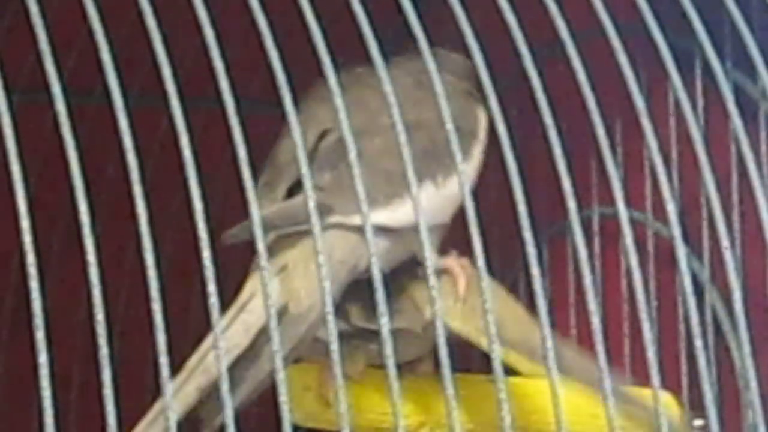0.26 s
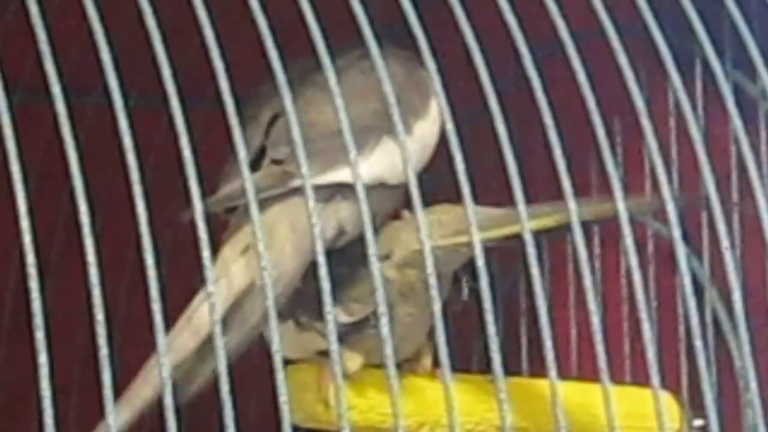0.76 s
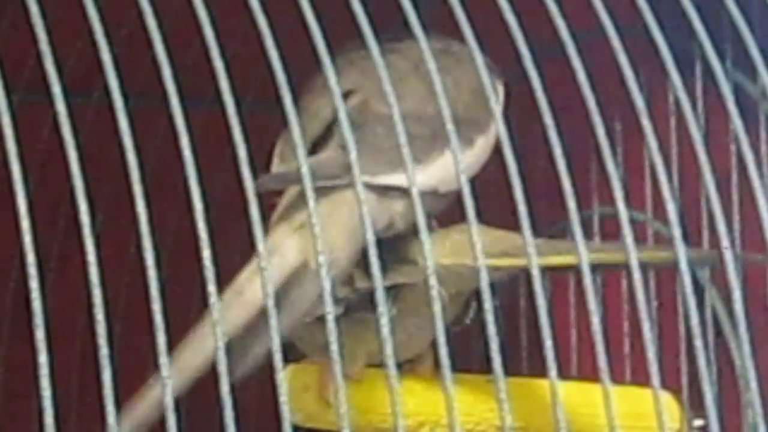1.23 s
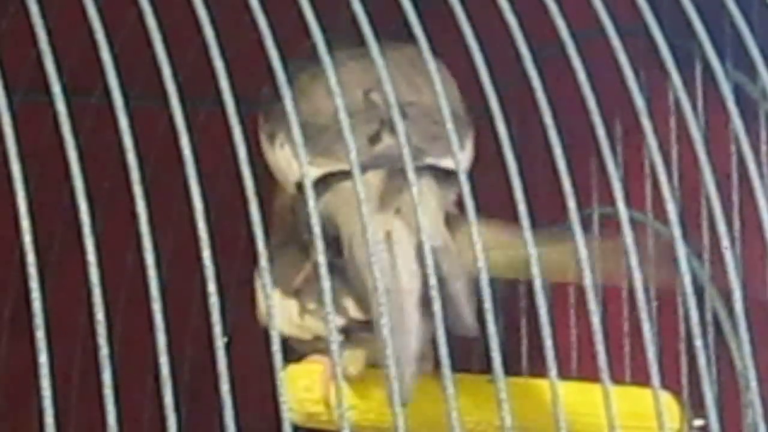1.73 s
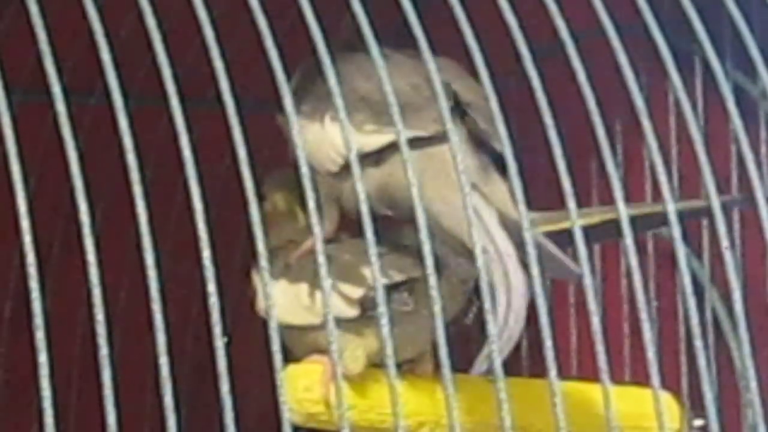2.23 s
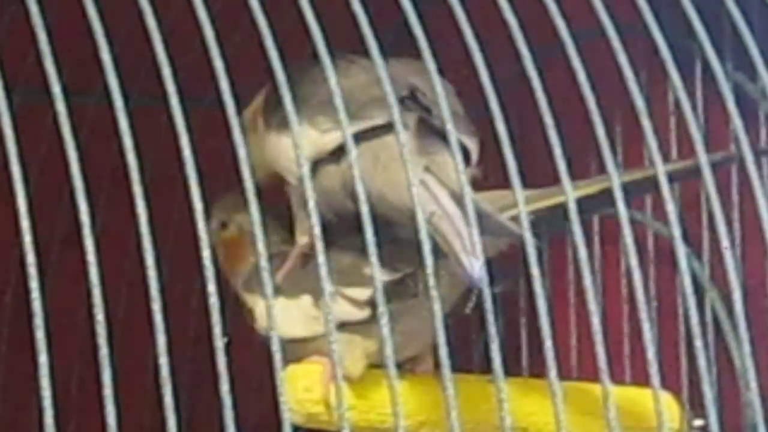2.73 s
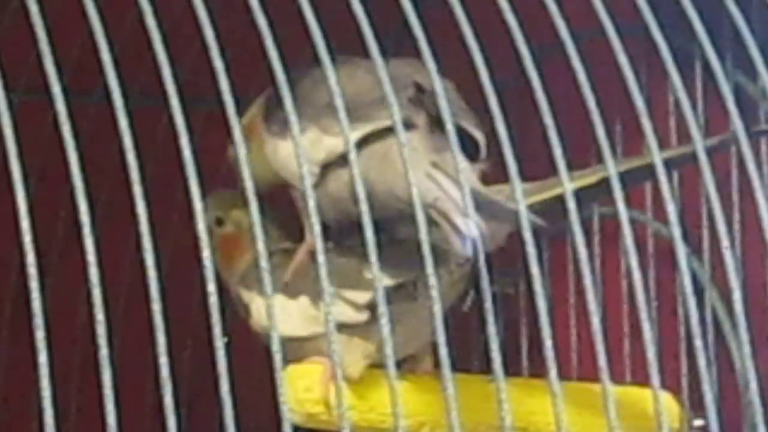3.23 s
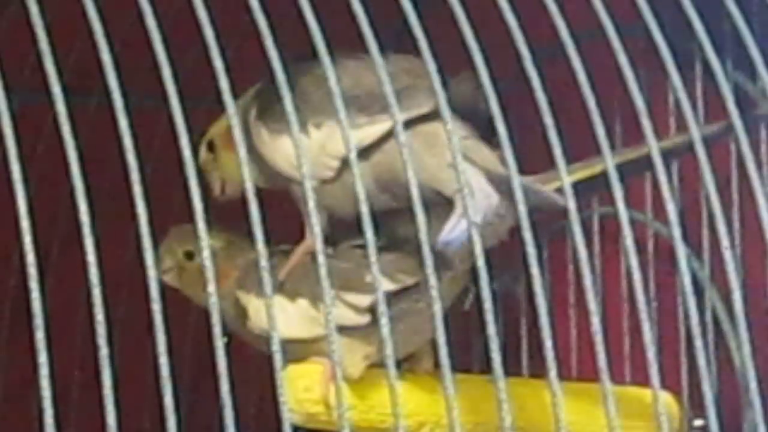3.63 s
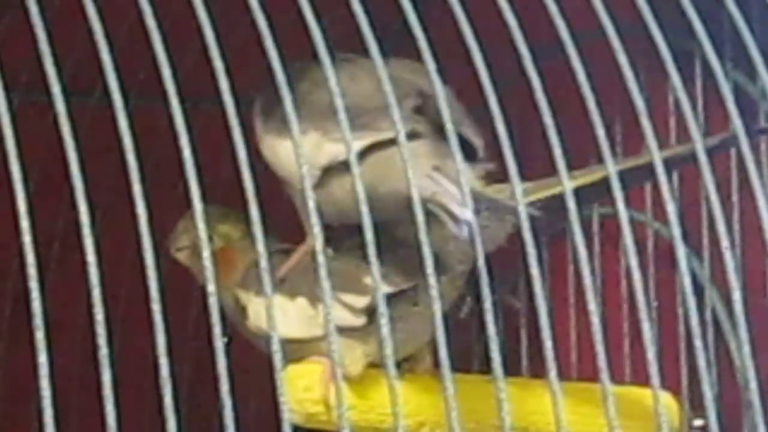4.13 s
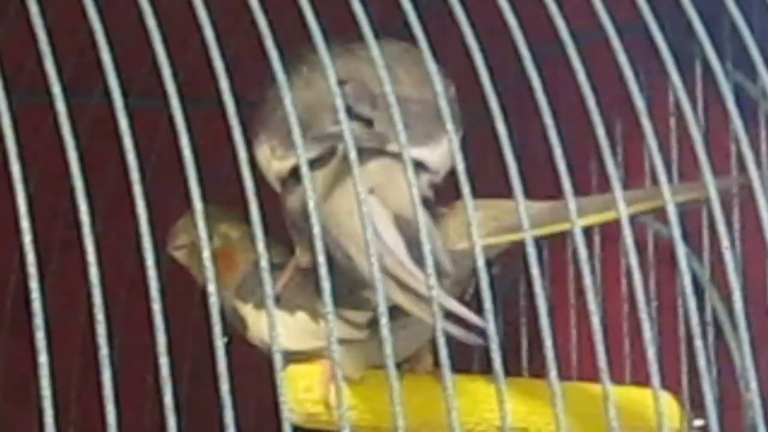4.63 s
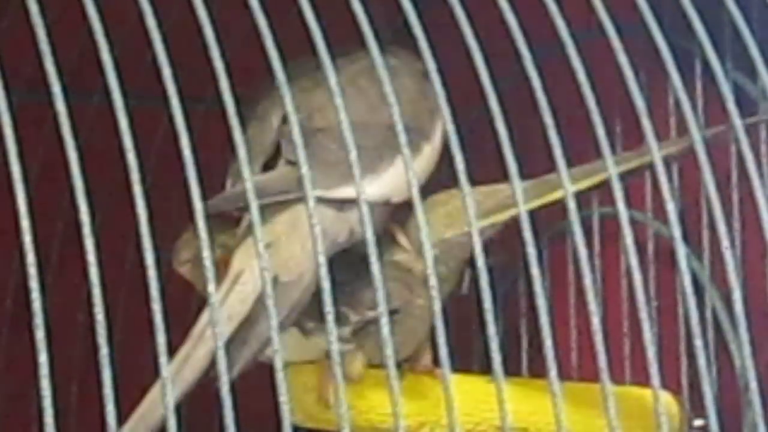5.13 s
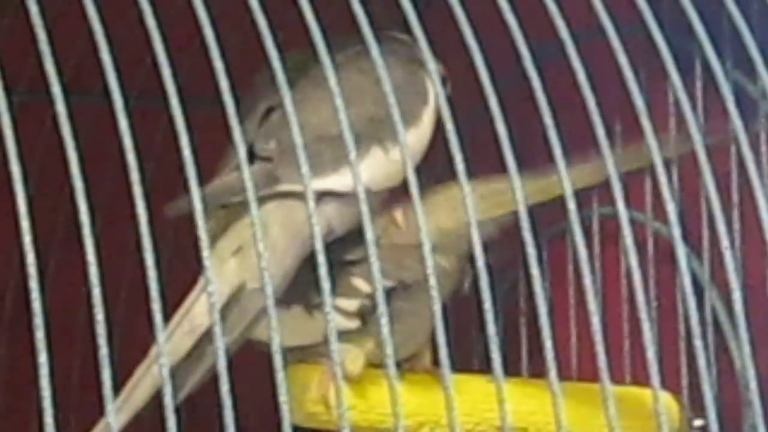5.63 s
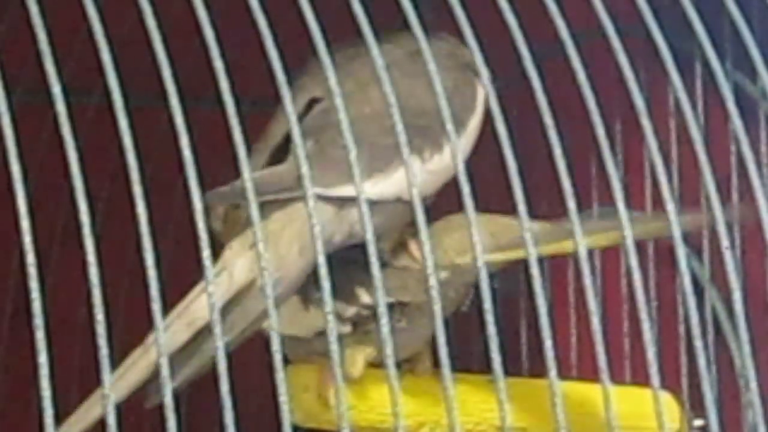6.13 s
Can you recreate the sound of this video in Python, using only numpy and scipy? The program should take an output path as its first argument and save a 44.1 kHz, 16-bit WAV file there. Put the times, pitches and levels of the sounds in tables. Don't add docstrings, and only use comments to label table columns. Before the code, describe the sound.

Two caged cockatiels call a metre or two from a small camera. A lone swooping whistle leads into a hurried cluster of chirps and hoarse squawks, then loud harsh screams, a few softer whistles, a pause, and bright closing notes. Hard walls give each call a short ring. Claws scratch lightly, a wing puffs, and hiss, distant traffic rumble and thin camera-motor whine continue underneath.

```python
import sys
import numpy as np
from scipy import signal
from scipy.fft import rfft, irfft
from scipy.io import wavfile
from scipy.ndimage import uniform_filter1d

SR = 44100
rng = np.random.default_rng(int(sys.argv[2]) if len(sys.argv) > 2 else 0)


def convert_level_to_amplitude(level_db):
    exponent = np.asarray(level_db, float) / 20
    return 10 ** exponent


def bounce(signal):
    frames = np.transpose(np.atleast_2d(signal))
    limited = np.clip(frames, -1, 1)
    pcm = np.round(limited * 32767).astype(np.int16)
    wavfile.write(sys.argv[1], SR, pcm)


N = 280476


def read_db(points, hz):
    at_hz, level_db = np.transpose(points)
    return np.interp(np.log(hz), np.log(at_hz), level_db)


def colour(x, points):
    hz = np.arange(len(x) // 2 + 1) * SR / len(x) + 1
    y = irfft(rfft(x) * convert_level_to_amplitude(read_db(points, hz)), len(x))
    return y / np.std(y)


def noise_band(low_hz, high_hz):
    band = signal.butter(2, [low_hz, high_hz], "band", fs=SR, output="sos")
    y = signal.sosfilt(band, rng.standard_normal(N))
    return y / np.std(y)


def walk(turns_per_s):
    k = max(int(SR / turns_per_s), 2)
    y = uniform_filter1d(uniform_filter1d(rng.standard_normal(N), k), k)
    return y / np.std(y)


def sine(hz):
    return np.sin(2 * np.pi * np.cumsum(hz) / SR)


# pitch_hz, level_db
HISS_COLOUR = [(15, -46), (25, -1), (268, -4.5), (617, -6), (975, -8), (1210, -8), (1350, -8.5),
               (1760, -8.5), (2020, -10), (2440, 0.5), (3100, -13), (3750, -11), (4650, -16.5),
               (10700, -21.5), (15600, -29.5)]


def hiss():
    return convert_level_to_amplitude(-51.5 + .5 * walk(0.34)) * colour(rng.standard_normal(N), HISS_COLOUR)


# time_s, nearness_db
TRAFFIC_NEARNESS = [(0, -6), (2.8, -5), (3.1, -3), (3.7, -1), (4.3, 1.5), (4.7, 1.8), (5.5, .3),
                    (6.36, -1.5)]


def traffic():
    t = np.arange(N) / SR
    near_db = np.interp(t, *np.transpose(TRAFFIC_NEARNESS))
    thrum = convert_level_to_amplitude(-62.5 + 2.9 * near_db + 2.6 * walk(25)) * sine(40.5 + 2.05 * walk(5.5))
    drone = convert_level_to_amplitude(-61 + 0.9 * near_db) * noise_band(233, 364)
    return thrum + drone


# pitch_hz, level_db
GEAR_TONES = [(1863, -71), (2439, -62), (2466, -76), (2756, -64), (5830, -84), (6691, -79), (7854, -96),
              (7881, -75)]
# pitch_hz, width_hz, level_db
SHELL_BANDS = [(2550, 130, -67.5), (2816, 270, -63), (1807, 58, -68.5)]


def camera_motor():
    t = np.arange(N) / SR
    shaft_hz, shaft_depth = 28.8, 0.23
    turn = 1 + shaft_depth * np.sin(2 * np.pi * shaft_hz * t)
    drift = np.cumsum(1 + 0.0008 * walk(4.9)) / SR
    whine = sum(convert_level_to_amplitude(db + 2 * walk(6.4)) * np.sin(2 * np.pi * hz * drift) for hz, db in GEAR_TONES)
    shell = sum(convert_level_to_amplitude(db) * noise_band(hz - width / 2, hz + width / 2) for hz, width, db in SHELL_BANDS)
    return shell + np.sqrt(2) * turn * whine


def note(row, scoop_hz, crest, bend, swell_db, tilt_db, half_db, rasp_db, over_db):
    start_s, length_s, crest_hz, end_hz, level_db = row
    u = np.arange(17) / 16
    before = np.clip(1 - u / crest, 0, 1)
    after = np.clip((u - crest) / (1 - crest), 0, 1)
    pitch_hz = crest_hz - scoop_hz * before ** 2.6 - (crest_hz - end_hz) * after ** bend
    lift_db = tilt_db * after - swell_db * before
    held_db = 0.39 * lift_db
    effort_db = -0.23 * (level_db + 31) + 0 * u
    return np.transpose([start_s + length_s * u, pitch_hz, level_db + lift_db,
                         half_db - held_db, rasp_db - held_db, over_db + effort_db])


def phrase(tables):
    notes = (note(row, **kind) for rows, kind in tables for row in rows)
    return sorted(notes, key=lambda n: n[0][0])


def breath_control(notes):
    t = np.arange(N) / SR
    s, *columns = np.concatenate(notes).T
    hz, level_db, half_db, rasp_db, over_db = (np.interp(t, s, c) for c in columns)
    gate = np.zeros(N)
    for n in notes:
        opening, shutting = (t - n[0][0]) / 0.0012, (n[-1][0] - t) / .011
        gate += np.clip(np.minimum(opening, shutting), 0, 1)
    return hz, gate * convert_level_to_amplitude(level_db - 5.5), half_db, rasp_db, over_db


# pitch_multiple, level_db
OVERTONE_LINES = [(3, 3.5), (4, 2.5), (5, -3)]
# pitch_multiple, level_db
HALF_PITCH_LINES = [(.5, 2), (1.5, -17.5)]
# pitch_hz, level_db
THROAT_COLOUR = [(400, -26), (800, -10.5), (1400, -8.5), (2000, -13), (2800, 3.5), (3600, -2.5),
                 (5200, -11.5), (7000, -29.5), (8600, -18), (10000, -25), (11500, -24), (13000, -20),
                 (15500, -32)]
# pitch_hz, level_db
WINDPIPE_GAIN = [(2500, 15), (3300, -6), (4600, -14.5), (5150, -21), (5600, -22), (6100, -19.5),
                 (7200, -23.5), (8600, -6), (10000, -24.5), (11400, 2.5), (12800, -15), (14200, -8),
                 (15500, -19)]
# pitch_hz, level_db
BEAK_GAIN = [(1300, -2), (1900, 1), (2300, 0.5), (2700, 4.5)]
# start_s, end_s, chaos (0 to 1)
VOICE_BREAKS = [(1.075, 1.12, .3), (1.19, 1.265, .4), (1.61, 1.8, .55), (1.835, 1.88, .5),
                (2.124, 2.16, .3), (2.155, 2.21, .6), (2.5, 2.58, .7), (2.6, 2.7, .12), (3.065, 3.1, .6),
                (3.22, 3.36, .45), (3.272, 3.32, .3), (3.625, 3.66, .2), (5.2, 5.24, .15),
                (5.768, 5.83, .7), (6.2, 6.23, .4)]


def bird(tables):
    hz, loud, half_db, rasp_db, over_db = breath_control(phrase(tables))
    t = np.arange(N) / SR
    chaos = .12 * np.ones(N)
    for start_s, end_s, strength in VOICE_BREAKS:
        chaos += strength * np.clip(np.minimum(t - start_s, end_s - t) / 0.0087, 0, 1)
    shake = 1 + chaos * (.03 * walk(500) + .025 * walk(60))
    cycles = np.cumsum(hz * shake / SR)

    def partial(multiple, db):
        return convert_level_to_amplitude(db) * np.sin(2 * np.pi * multiple * cycles)

    whistle = partial(0.98, read_db(BEAK_GAIN, hz)) + partial(2, read_db(WINDPIPE_GAIN, 2 * hz))
    for k, db in OVERTONE_LINES:
        whistle += partial(k, over_db + db + read_db(WINDPIPE_GAIN, k * hz))
    flap = sine(650 * (1 + .25 * walk(25)))
    whistle *= (1 - .6 * chaos + .45 * chaos * flap) * convert_level_to_amplitude((.8 + 5 * chaos) * walk(250))
    half = np.zeros(N)
    for k, db in HALF_PITCH_LINES:
        half += partial(k, half_db + 9 * chaos + db) * (0.61 + 0.59 * walk(780))
    slaps = np.diff(np.floor(cycles), prepend=0) * rng.standard_normal(N) * convert_level_to_amplitude(0.5 * walk(300))
    rasp = convert_level_to_amplitude(rasp_db + 10 * chaos + 6) * colour(slaps, THROAT_COLOUR)
    return loud * (np.sqrt(2) * (whistle + half) + rasp)


# start_s, length_s, crest_hz, end_hz, level_db
SECOND_PEEPS = [(0, 0.036, 2163, 2760, -41.5), (1.195, 0.064, 3170, 2880, -40),
                (1.347, 0.02, 1640, 1570, -31), (1.612, .023, 2524, 1897, -36),
                (1.678, .017, 2516, 2509, -29), (1.73, 0.041, 2453, 1882, -37),
                (2.552, .022, 3314, 3289, -37.5), (2.76, .018, 2058, 2084, -37),
                (4.692, 0.017, 2320, 2100, -32), (5.158, 0.0212, 2218, 2647, -42),
                (5.675, .055, 2125, 2098, -43.5)]
PEEP = dict(scoop_hz=17, crest=.15, bend=1.1, swell_db=-1, tilt_db=2.5, half_db=-29, rasp_db=-28.5, over_db=-31)
SECOND_RASPS = [
    (1.83, .017, 3518, 3292, -31),
    (1.848, .036, 2306, 1472, -26.5),
    (3.3, .045, 2458, 1688, -35.5),
    (5.775, .055, 2005, 1329, -35.5),
]
RASP = dict(scoop_hz=15, crest=.15, bend=1.1, swell_db=-3, tilt_db=2, half_db=-33, rasp_db=-23, over_db=-19)
SECOND_CALLS = [
    (3.602, .035, 2870, 2564, -25),
]
CALL = dict(scoop_hz=153.7, crest=.45, bend=1.4, swell_db=17, tilt_db=2, half_db=-25, rasp_db=-15.5, over_db=-28)
SECOND_HOLDS = [
    (3.638, .056, 2585, 2033, -25.5),
]
SECOND_HOLD = dict(scoop_hz=12, crest=.1, bend=3.2, swell_db=-7, tilt_db=-3,
                   half_db=-26, rasp_db=-15.5, over_db=-16)
SECOND_DOUBLES = [
    (2.722, .03, 3068, 3310, -33),
]
SECOND_DOUBLE = dict(scoop_hz=15, crest=.1, bend=1.1, swell_db=5, tilt_db=3,
                     half_db=-6.5, rasp_db=-22, over_db=-28)


def second_bird():
    return bird([(SECOND_PEEPS, PEEP), (SECOND_RASPS, RASP), (SECOND_CALLS, CALL),
                 (SECOND_HOLDS, SECOND_HOLD), (SECOND_DOUBLES, SECOND_DOUBLE)])


# delay_s, level_db
WALL_ECHOES = [
    (.0052, -8),
    (0.0117, -9),
    (0.0209, -8.5),
    (.033, -21),
    (.046, -11.5),
]


def room(x):
    t = np.arange(SR) / SR
    t60_s, treble_t60_s = 0.54, 0.48
    noise = rng.standard_normal(len(t))
    low = signal.sosfilt(signal.butter(2, 5000, fs=SR, output="sos"), noise)
    tail = low * convert_level_to_amplitude(-60 * t / t60_s) + (noise - low) * convert_level_to_amplitude(-60 * t / treble_t60_s)
    tail *= np.clip((t - 0.0063) / 0.0043, 0, 1)
    energy = SR * t60_s / (2 * np.log(1000))
    tail *= convert_level_to_amplitude(-1) / np.sqrt(energy)
    for delay_s, db in WALL_ECHOES:
        tail[int(delay_s * SR)] += convert_level_to_amplitude(db)
    return x + signal.fftconvolve(x, tail)[:N]


# start_s, length_s, crest_hz, end_hz, level_db
SWOOPS = [
    (.666, .082, 2826, 1501, -30.5),
    (4.102, .08, 2560, 2129, -31.5),
]
SWOOP = dict(scoop_hz=1348.4, crest=.5, bend=2.3, swell_db=12, tilt_db=-5.5,
             half_db=-35, rasp_db=-36, over_db=-27.5)
HOARSE_NOTES = [
    (1.068, .071, 2843, 2410, -31),
]
HOARSE = dict(scoop_hz=20, crest=.3, bend=1.3, swell_db=14, tilt_db=1, half_db=-12, rasp_db=-17.5, over_db=-17.5)
GLIDES = [(1.14, 0.026, 2471, 2354, -29.5), (1.171, .034, 2370, 2850, -31.5),
          (1.206, .052, 2720, 1220, -28.5), (1.259, .022, 1300, 1269, -36), (1.705, 0.039, 2800, 2621, -31),
          (1.745, .03, 2682, 2676, -36), (3.225, .05, 2790, 2683, -31), (4.248, 0.053, 2651, 1898, -34),
          (4.328, .05, 2706, 2148, -33.5), (6.153, .02, 2683, 2644, -34), (6.315, 0.019, 2612, 2744, -27.5)]
GLIDE = dict(scoop_hz=15, crest=.1, bend=1.25, swell_db=2, tilt_db=0.8, half_db=-26, rasp_db=-25, over_db=-21)
ARCHED_NOTES = [
    (1.286, .07, 2807, 1506, -29.5),
    (5.176, .06, 2869, 2210, -26),
    (6.174, .055, 2848, 2144, -23.5),
]
ARCH = dict(scoop_hz=149.96, crest=.45, bend=1.3, swell_db=18, tilt_db=-8,
            half_db=-22.5, rasp_db=-21, over_db=-25)
SPLIT_NOTES = [
    (1.603, 0.041, 2894, 2724, -34.5),
    (1.649, .054, 2885, 3097, -34.5),
]
SPLIT = dict(scoop_hz=15, crest=.1, bend=1.1, swell_db=-3, tilt_db=-4, half_db=-6.5, rasp_db=-19.5, over_db=-20)
HARSH_SCREAMS = [
    (1.785, 0.074, 2981, 2548, -27),
    (2.163, 0.025, 2720, 2600, -30.5),
    (2.188, .074, 2945, 2480, -22.5),
    (3.12, 0.079, 2888, 2002, -21.5),
]
SCREAM = dict(scoop_hz=200.4, crest=.5, bend=1.5, swell_db=8, tilt_db=-3.5,
              half_db=-24.5, rasp_db=-17, over_db=-16.5)
# Abrupt, noisy notes, crest_hz being near the start
NOISY_CROAKS = [
    (2.124, .038, 2784, 2750, -32),
    (2.507, .068, 2510, 2690, -37),
    (3.034, .056, 2725, 2585, -30.5),
    (3.276, 0.04, 2720, 2457, -30),
]
CROAK = dict(scoop_hz=15, crest=.15, bend=1.2, swell_db=9, tilt_db=-2.5, half_db=-17, rasp_db=-16.5, over_db=-19)
SLOW_CLIMBS = [
    (2.578, .134, 3127, 2353, -25),
]
CLIMB = dict(scoop_hz=427.6, crest=0.8, bend=1.7, swell_db=7.5, tilt_db=1.5,
             half_db=-27, rasp_db=-19.5, over_db=-19)
HELD_NOTES = [
    (5.312, 0.052, 2780, 2120, -32),
    (5.614, 0.07, 2663, 2050, -29),
    (5.735, .05, 2629, 2000, -27),
    (6.336, .032, 2750, 1824, -27.5),
]
HOLD = dict(scoop_hz=15, crest=.1, bend=4.5, swell_db=3, tilt_db=-4, half_db=-27, rasp_db=-23, over_db=-23)


def first_bird():
    return bird([(SWOOPS, SWOOP), (HOARSE_NOTES, HOARSE), (GLIDES, GLIDE), (ARCHED_NOTES, ARCH),
                 (SPLIT_NOTES, SPLIT), (HARSH_SCREAMS, SCREAM), (NOISY_CROAKS, CROAK),
                 (SLOW_CLIMBS, CLIMB), (HELD_NOTES, HOLD)])


# start_s, peak_db
CLAW_SCRATCHES = [
    (1.4016, -53),
    (2.4039, -63),
    (5.1584, -48),
    (5.3004, -50),
]


def claws():
    t = np.arange(N) / SR
    force = np.zeros(N)
    for start_s, db in CLAW_SCRATCHES:
        force += convert_level_to_amplitude(db) * (t > start_s) * np.exp(-np.abs(t - start_s) / 0.0037)
    return force * noise_band(5000, 10000)


# middle_s, length_s, level_db
WING_BEATS = [
    (3.116, 0.048, -52),
    (6.089, 0.032, -59.5),
]


def wings():
    t = np.arange(N) / SR
    puffs = sum(convert_level_to_amplitude(db) * np.exp(-((t - s) / length_s) ** 2) for s, length_s, db in WING_BEATS)
    return puffs * noise_band(55, 590)


def scene():
    in_room = room(first_bird() + second_bird() + claws())
    puffs = wings()
    background = hiss() + traffic() + camera_motor()
    return (in_room + puffs + background)[None]


def low_pass(x):
    return signal.sosfilt(signal.butter(12, 15770, fs=SR, output="sos"), x)


def record(dry):
    top_cut = signal.ellip(8, .2, 60, 15650, fs=SR, output="sos")
    mix = signal.sosfilt(top_cut, dry)
    return low_pass(mix)


dry = scene()
out = record(dry)
bounce(out)
```